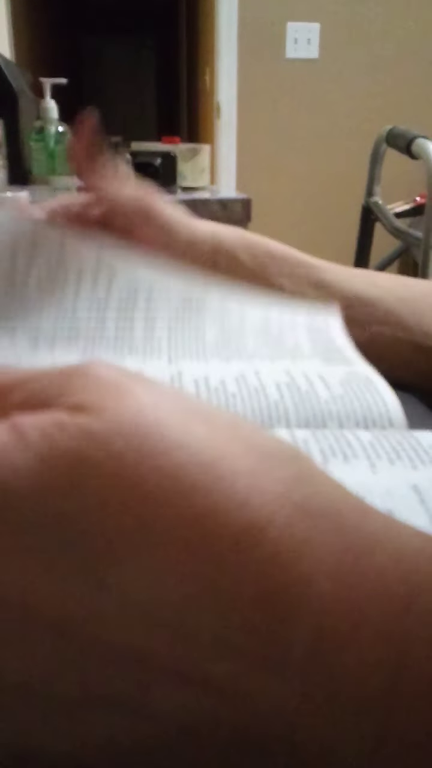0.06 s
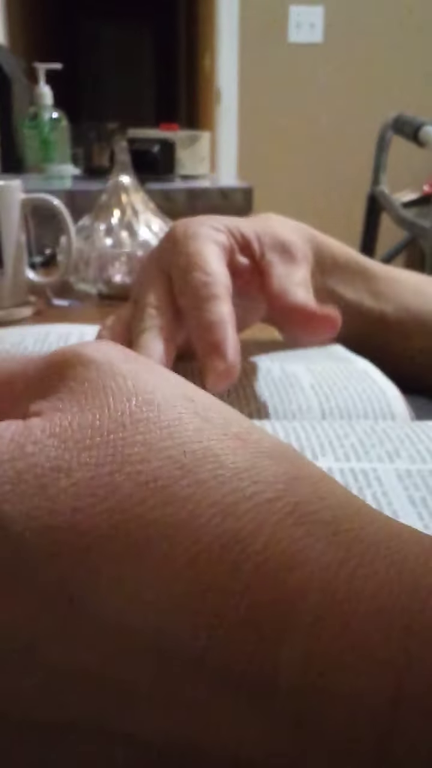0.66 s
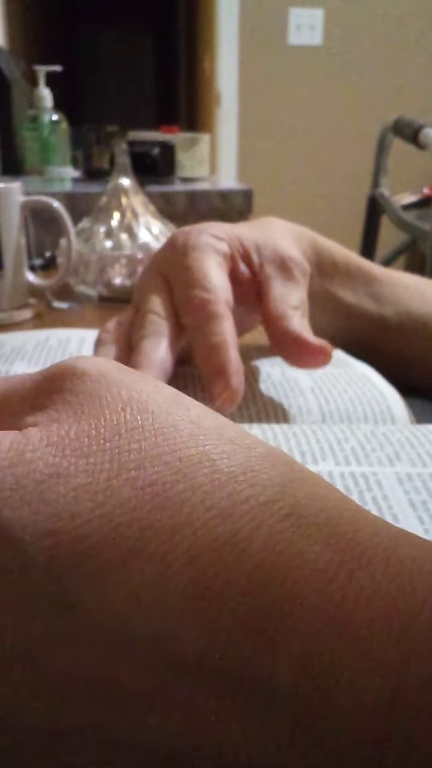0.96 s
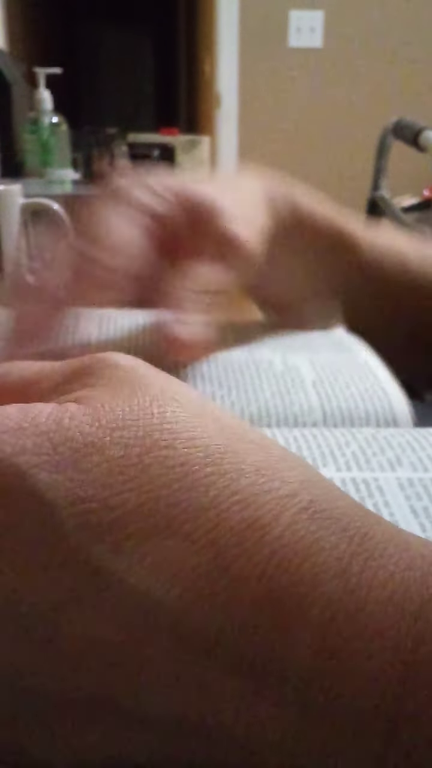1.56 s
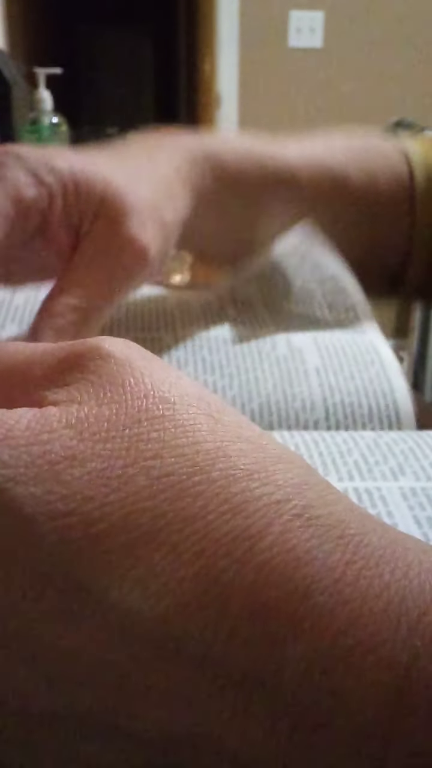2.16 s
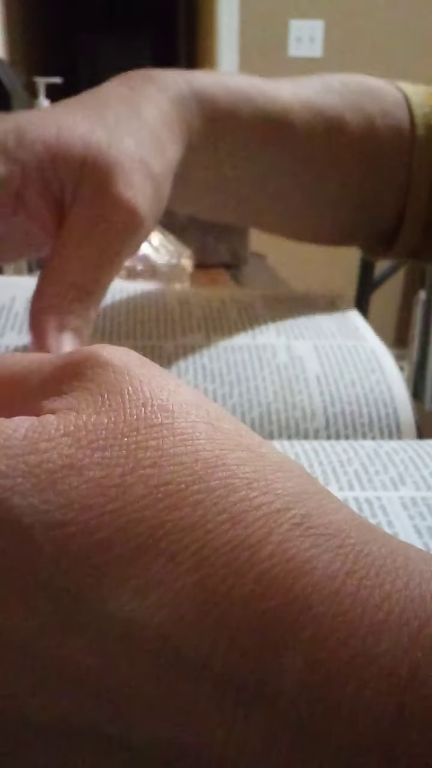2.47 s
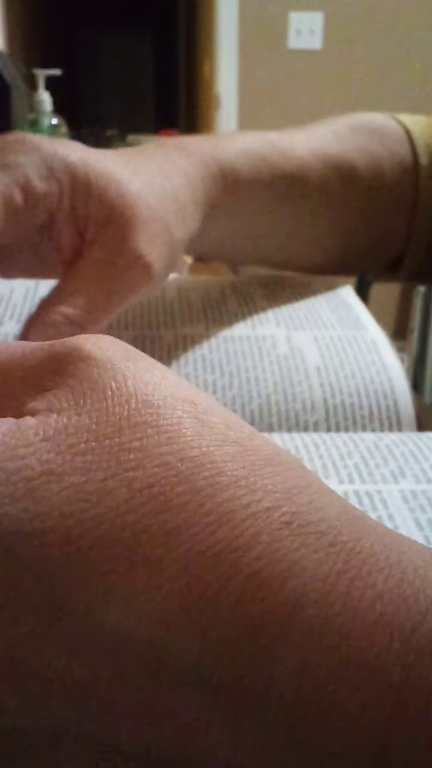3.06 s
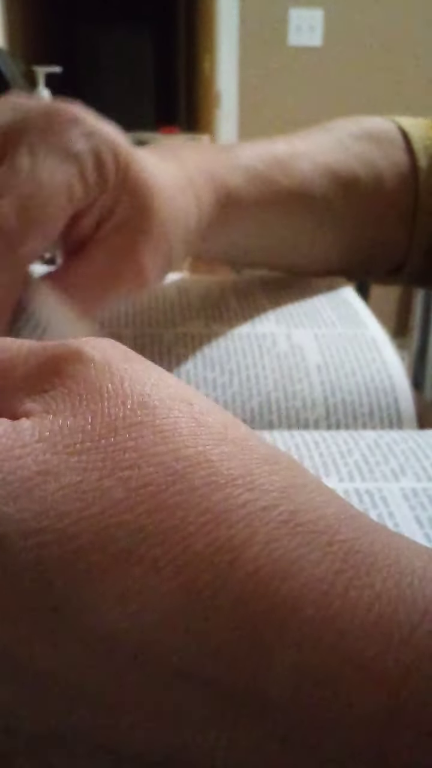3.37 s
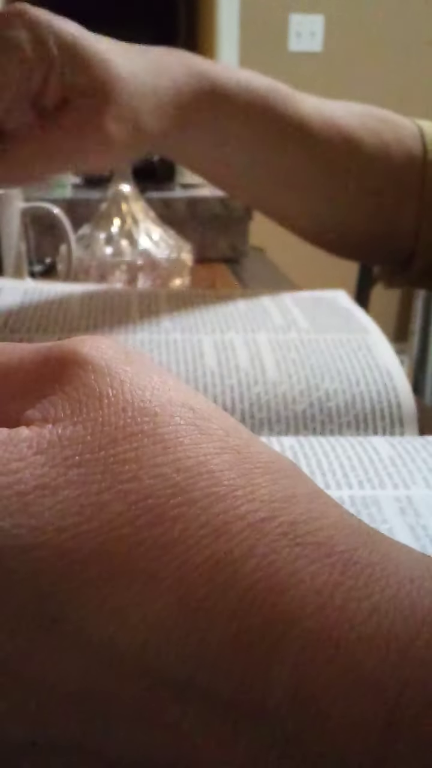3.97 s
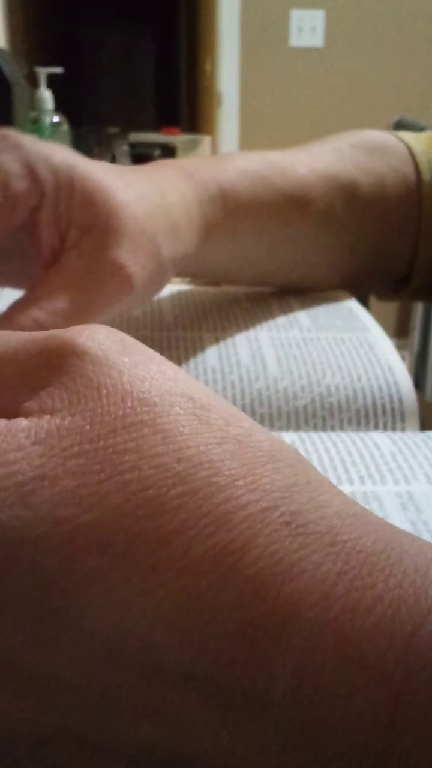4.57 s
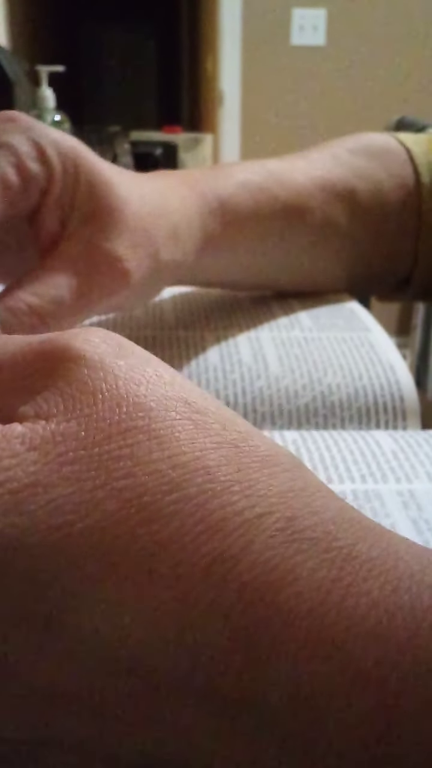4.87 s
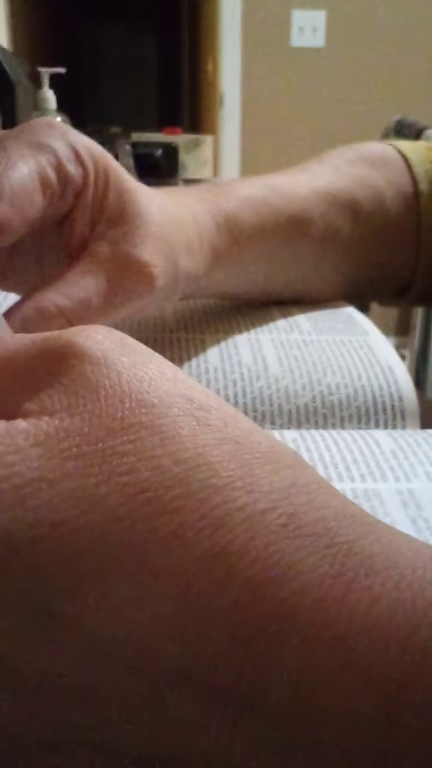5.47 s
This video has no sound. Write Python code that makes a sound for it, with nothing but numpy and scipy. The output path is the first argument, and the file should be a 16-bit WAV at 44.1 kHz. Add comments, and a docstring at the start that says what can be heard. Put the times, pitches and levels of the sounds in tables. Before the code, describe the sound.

A hand turns a thin page of a thick book, and the sheet buckles in a quick run of snaps and crinkles. Fingers then slide softly over the paper and pick at its edges with small flicks and ticks. A second page turns with a sharper snap, followed by more faint rubbing. It is all heard close up in a small room, over a steady low appliance hum.

```python
"""In a small room, close by, a hand turns the thin pages of a thick book twice.
Each sheet buckles in a quick run of snaps, crinkles as its small creases give way, and flops down.
Between turns, fingers slide over the paper, which sticks and slips, and pick at its edges.
Underneath, an appliance hums on mains power over faint room noise."""
import sys
import numpy as np
from scipy import signal
from scipy.fft import rfft, irfft, next_fast_len
from scipy.io import wavfile
from scipy.ndimage import map_coordinates

SR = 44100
rng = np.random.default_rng(int(sys.argv[2]) if len(sys.argv) > 2 else 0)


def wav_out(sig):
    """Save sig, one row per channel (or a flat mono array), as 16-bit PCM at SR to the path in sys.argv[1]."""
    wavfile.write(sys.argv[1], SR, np.round(np.clip(np.atleast_2d(sig).T, -1, 1) * 32767).astype(np.int16))


N = 248784
TIME = np.arange(N) / SR


def snaps(crackle_fade_s=.028):
    """A buckling sheet pushes out a short pop, flaps briefly, and its creases crackle."""
    # each time the sheet buckles: start_s, pop_db, pitch_hz, crackle_db
    buckles = [(0.3941, -28.5, 464, -44), (.3960, -17, 1120, -39.5), (.3995, -24.5, 772, -56),
               (0.46, -47, 1210, -49), (0.474, -13.5, 1110, -32.5), (0.4878, -25, 1290, -33.5),
               (.5150, -26, 1130, -27), (0.5185, -28, 1370, -26), (0.5452, -13, 716, -56),
               (.553, -20, 1244, -54), (.5580, -24, 840, -56.5), (3.673, -42.5, 1101, -44.5),
               (3.7031, -27, 1039, -32.5), (3.7118, -7.5, 1271, -17), (3.7162, -29.5, 474, -40),
               (3.722, -31, 1500, -32), (3.731, -29.5, 1593, -42), (3.7643, -21.5, 1090, -34.5),
               (3.7814, -26, 1273, -47), (3.788, -23, 1200, -46), (3.8140, -39.5, 1170, -58)]
    # harder pops start faster and end sooner: pop_db, attack_s, fade_s (time to fall 60 dB)
    pop_shapes = [(-28, .001, .03), (-22, 0.00073, .024), (-16, 0.00036, .008), (-11, .0003, .007)]
    # tone of the flapping paper: frequency_hz, level_db
    flap_tone = [(150, -19.5), (450, -7.5), (800, -6), (1250, 2), (1800, -5.5), (2400, -4), (3700, -11.5),
                 (5000, -25), (6500, -32.5), (8200, -60)]
    t = np.arange(SR // 8) / SR
    opening = 1 - np.exp(-t / 0.00038)  # creases open almost at once
    first_crack = 0.75 + 0.34 * np.exp(-t / 0.00062)  # the first crease gives way hardest
    strengths, attacks, fades = np.transpose(pop_shapes)
    pops, flap_power, crease_power = np.zeros((3, N))
    for start_s, pop_db, pitch_hz, crackle_db in buckles:
        span = slice(round(start_s * SR), round(start_s * SR) + len(t))
        attack_s = np.interp(pop_db, strengths, attacks)
        fade_s = np.interp(pop_db, strengths, fades)
        push = (1 - np.exp(-t / attack_s)) * gain(pop_db - 60 * t / fade_s)
        sagging_hz = pitch_hz * (1 + 0.13 * np.exp(-t / 0.00078))  # the bent paper relaxes
        pops[span] += push * np.sin(2 * np.pi * np.cumsum(sagging_hz) / SR)
        flap_power[span] += (push * min(1, 1200 / pitch_hz)) ** 2  # small, high patches flap less
        crease_power[span] += (opening * first_crack * gain(crackle_db - 60 * t / crackle_fade_s)) ** 2
    # the pops are heard with little bass and no top treble
    pops = signal.sosfilt(signal.butter(2, 130, "high", fs=SR, output="sos"), pops)
    pops = signal.sosfilt(signal.butter(10, 6900, fs=SR, output="sos"), pops)
    flap = gain(-11) * colour(np.sqrt(flap_power) * rng.standard_normal(N), flap_tone)
    return pops + flap + crackle(np.sqrt(crease_power) * rng.standard_normal(N))


def crackle(noise):
    """Give noise the crisp sound of paper creases giving way."""
    # tone of the creases: frequency_hz, level_db
    crease_tone = [(40, -14), (150, -5.5), (450, -5), (750, -5.5), (1300, 7), (1900, 1.5), (2400, 5),
                   (2900, -0.5), (3800, 1), (5000, -3.5), (6500, -1), (7200, -22), (8000, -44),
                   (15500, -43)]
    return colour(noise, crease_tone)


def crinkles():
    """As the bent sheet swings over, many small creases give way and its body flutters."""
    # each bend of the sheet: start_s, length_s, level_db
    bends = [(0.405, .02, -61), (0.508, 0.024, -46.5), (3.716, 0.075, -42.5)]
    # tone of the fluttering sheet: frequency_hz, level_db
    flutter_tone = [(200, -29), (700, -15), (1000, -4.5), (1250, 1), (1600, -1), (2400, -11.5), (5000, -29),
                    (8000, -57)]
    bending = sum(gain(level_db) * held(start_s, length_s, attack_s=0.0057, fade_s=.13)
                  for start_s, length_s, level_db in bends)
    flutter = patchy(fibres(spread_db=3.5), depth_db=7.5, width_hz=150, length_s=.03)
    creases = crackle(bending * fibres(spread_db=2.5))
    return creases + gain(-5) * colour(bending * flutter, flutter_tone)


def edge_flicks():
    """A page edge scrapes past a fingertip: a short swell with fizz on top."""
    # each flick: peak_s, level_db, rise_s, fizz_db (compared with the scrape)
    flicks = [(.519, -50.5, 0.0051, -5), (1.595, -49.5, 0.012, -12.5), (2.028, -60.5, .015, -9),
              (2.326, -54.5, 0.0077, -35), (2.818, -55, 0.012, -7), (2.984, -49, .009, -11),
              (3.658, -52, .008, -8.5), (3.719, -40.5, 0.0092, -8.5), (3.765, -43, 0.015, -13.5),
              (4.608, -56, 0.017, -23), (5.584, -57, 0.0062, -23)]
    # tone of the scraping edge: frequency_hz, level_db
    edge_tone = [(300, -25.5), (900, -15), (1350, 7), (2000, -11.5), (2400, 5), (2900, -6.5), (3700, 1),
                 (5200, 3.5), (6500, 12), (7200, 4), (8200, -36.5), (15500, -33.5)]
    # tone of the high fizz: frequency_hz, level_db
    fizz_tone = [(6000, -23), (8000, -7), (9500, -11), (12000, -4), (13500, -8), (15000, -2), (15800, 1.5)]
    scrape, fizz = np.zeros((2, N))
    for peak_s, level_db, rise_s, fizz_db in flicks:
        stroke = gain(level_db) * swell(peak_s, rise_s, fall_s=1.3 * rise_s)
        scrape += stroke
        fizz += stroke * gain(fizz_db)
    grains = fibres(spread_db=3.5)
    drifting_grains = patchy(grains, depth_db=2.0, width_hz=300, length_s=.05)
    return colour(scrape * drifting_grains, edge_tone) + colour(fizz * grains, fizz_tone)


def edge_ticks():
    """An edge catches on a fingertip and slips off with one tiny crackle."""
    # each slip: start_s, level_db
    slips = [(1.389, -51.5), (1.5628, -55), (1.5883, -47), (2.8006, -65), (3.425, -54), (3.483, -50.5),
             (3.6537, -44.5), (3.6663, -50.5)]
    bursts = sum(gain(level_db) * held(start_s, length_s=0.00079, attack_s=0.00049, fade_s=0.013)
                 for start_s, level_db in slips)
    return crackle(bursts * rng.standard_normal(N))


def slides():
    """Paper sticks and slips on paper and skin; its tone drifts as the sheet bends."""
    # each slide: start_s, length_s, rub_db, hiss_db, growth_db (change along the slide)
    strokes = [(-.03, .33, -65.5, -65.5, -4), (0.274, .11, -70.5, -74.5, -3),
               (0.582, 0.035, -74, -65.5, -3), (.65, .1, -72.5, -91.5, -7), (1.077, 0.033, -71, -82, 0),
               (1.227, 0.026, -76, -90, 0), (1.327, 0.12, -65, -71, 4.5), (1.44, .1, -65, -64, 2.5),
               (1.553, .21, -72, -63.5, -1.5), (1.789, 0.24, -73, -76, 15), (1.999, .33, -69, -62.5, 7),
               (2.096, 0.034, -64, -63, 2.5), (2.557, .14, -78, -83.5, 4), (2.696, .05, -67, -68.5, 1.5),
               (2.775, 0.068, -68, -67, -3), (2.959, 0.048, -64.5, -61, 1.5),
               (3.075, .18, -72.5, -69, -3.5), (3.252, 0.13, -72, -74, 2.5), (3.39, 0.12, -65, -68.5, 4.5),
               (3.514, 0.18, -69, -69, 5.5), (3.822, 0.18, -75.5, -72, -8), (4.247, 0.25, -80.5, -85.5, -2),
               (4.444, .085, -64.5, -67, 7.5), (4.561, 0.095, -63, -61.5, 3),
               (4.693, 0.039, -66, -63.5, -2.5), (4.778, 0.048, -70.5, -68, 3), (4.907, 0.1, -79, -89, -2),
               (5.007, 0.25, -77.5, -76, 1.5), (5.237, .14, -69, -71.5, -5), (5.492, .1, -67.5, -64.5, 11)]
    # tone of the lower rubbing: frequency_hz, level_db
    rub_tone = [(200, -30), (450, -21), (900, -15), (1100, -8.5), (1320, 4), (1520, -8.5), (1800, -4.5),
                (2060, -14), (2340, 2), (2650, -9), (3400, -16.5), (8000, -64)]
    # tone of the higher hiss: frequency_hz, level_db
    hiss_tone = [(1500, -32), (2600, -15), (3200, -9), (3750, 0), (4300, -8.5), (5200, -4), (6400, 6),
                 (7100, -9), (8200, -31.5), (10500, -36.5), (12000, -28), (13500, -40), (15500, -22.5)]
    rub, hiss = np.zeros((2, N))
    for start_s, length_s, rub_db, hiss_db, growth_db in strokes:
        speed = held(start_s, length_s, attack_s=0.03, fade_s=.15, growth_db=growth_db)
        rub = np.hypot(rub, gain(rub_db) * speed)  # overlapping slides add in power
        hiss = np.hypot(hiss, gain(hiss_db) * speed)
    grip = unit_level(gain(1.8 * wobble(70)))
    grains = grip * patchy(fibres(spread_db=1.5), depth_db=3.5, width_hz=200, length_s=.08)
    return colour(rub * grains, rub_tone) + colour(hiss * grains, hiss_tone)


def palm():
    """A soft palm lands on the stack of pages with a dull brush."""
    # tone of skin on the pages: frequency_hz, level_db
    palm_tone = [(250, -1.5), (750, 8.5), (1200, 13), (1750, 8.5), (2400, 1), (3000, -29), (3900, 4),
                 (4500, -46), (9000, -71)]
    touch = gain(-55.5) * held(start_s=1.905, length_s=0.077, attack_s=.035, fade_s=.1)
    return colour(touch * fibres(spread_db=2.0), palm_tone)


def brushes():
    """Moving hands and bending sheets stir the book: soft puffs of noise, each around one pitch."""
    # each movement: peak_s, level_db, rise_s (also its fall), pitch_hz
    movements = [(.03, -70.5, 0.095, 326), (.24, -62, 0.032, 1284), (0.391, -46.5, 0.008, 980),
                 (0.398, -44, 0.0052, 503), (0.547, -55.5, 0.02, 74), (0.548, -39, 0.0056, 370),
                 (0.713, -66.5, 0.0071, 2680), (1.111, -72.5, 0.013, 2900), (1.401, -68.5, 0.016, 580),
                 (2.329, -55.5, 0.014, 3400), (2.33, -68.5, 0.065, 350), (3.485, -54.5, 0.0038, 2530),
                 (3.681, -56, 0.027, 1000), (3.718, -50.5, 0.0097, 370), (4.213, -73, .035, 465),
                 (5.284, -67.5, 0.029, 2740), (5.355, -62, 0.015, 2900), (5.5, -72, 0.062, 309)]
    puffs = np.zeros(N)
    for peak_s, level_db, rise_s, pitch_hz in movements:
        band = signal.butter(2, [pitch_hz / 1.2, pitch_hz * 1.164], "band", fs=SR, output="sos")
        noise = unit_level(signal.sosfilt(band, rng.standard_normal(N)))
        puffs += gain(level_db) * swell(peak_s, rise_s, fall_s=rise_s) * noise
    return puffs


def low_background():
    """Faint, low background noise that wavers at random."""
    # tone of the low noise: frequency_hz, level_db
    low_tone = [(150, -24), (310, -3.5), (500, -2), (900, -25.5), (3000, -60.5)]
    noise = patchy(rng.standard_normal(N), depth_db=5.5, width_hz=110, length_s=0.072)
    return gain(-82.7 + 3.5 * wobble(11)) * colour(noise, low_tone)


def room_echo(sound, near_db, tail_db):
    """Sound bounces off the book and table almost at once; the walls add a short tail."""
    # how long the wall echo takes to fall 60 dB: frequency_hz, fade_s
    wall_fades = [(150, .35), (1200, 0.23), (3000, 0.18), (6500, 0.27), (14000, 0.062)]
    hz, t, bands = signal.stft(rng.standard_normal(SR // 2), SR, nperseg=256)
    fading = gain(-60 * t / look_up(wall_fades, hz)[:, None])
    tail = signal.istft(bands * fading, SR, nperseg=256)[1]
    delay_s = np.arange(len(tail)) / SR
    tail *= 1 - np.exp(-delay_s / 0.0021)
    near = rng.standard_normal(len(delay_s)) * gain(-60 * delay_s / 0.15) * (delay_s > .001)
    echoes = gain(near_db) * near / np.linalg.norm(near) + gain(tail_db) * tail / np.linalg.norm(tail)
    return signal.fftconvolve(sound, echoes)[:N]


def mains_hum(pitch_hz=120):
    """An appliance hums at twice the mains frequency, with one faint overtone."""
    phase = 2 * np.pi * pitch_hz * TIME + 0.033 * wobble(3.3)
    low_note = gain(-56.0 + 0.91 * wobble(15)) * np.sin(phase)
    overtone = gain(-86.5) * np.sin(3 * phase)
    return np.sqrt(2) * (low_note + overtone)


def room_air():
    """Faint, wavering noise fills the room."""
    # tone of the air: frequency_hz, level_db
    air_tone = [(25, -27.5), (75, -3.5), (140, 2.5), (220, -7), (350, -15), (600, -15.5), (1000, -22.5),
                (1300, -16.5), (1600, -25), (2050, -29), (2340, -22), (2700, -28), (4000, -29), (6800, -30),
                (8500, -42.5), (13500, -39.5), (15200, -34)]
    air = patchy(rng.standard_normal(N), depth_db=1, width_hz=68, length_s=0.03)
    return gain(-69.5) * colour(air, air_tone)


def fibres(spread_db):
    """Countless tiny slips of paper fibres clump into grains of uneven size."""
    return unit_level(rng.standard_normal(N) * gain(spread_db * wobble(1500)))


def gain(db):
    """Turn decibels into a number to multiply by."""
    return 10 ** (np.asarray(db) / 20)


def unit_level(sound):
    """Scale a sound so its average power is 1."""
    return sound / np.sqrt(np.mean(sound ** 2) + 1e-20)


def look_up(points, hz):
    """Read between (frequency_hz, value) rows, with octaves evenly spaced."""
    frequencies, values = np.transpose(points)
    return np.interp(np.log(hz + 1), np.log(frequencies), values)


def held(start_s, length_s, attack_s, fade_s, growth_db=0):
    """A loudness curve that rises, holds (changing by growth_db), then falls 60 dB every fade_s."""
    t = TIME - start_s
    hold_db = growth_db * (np.clip(t / length_s, 0, 1) - .5)
    drop_db = 60 * np.maximum(t - length_s, 0) / fade_s
    return np.clip(t / attack_s, 0, 1) * gain(hold_db - drop_db)


def swell(peak_s, rise_s, fall_s):
    """A bell-shaped loudness curve with its top at peak_s."""
    return np.exp(-.5 * ((TIME - peak_s) / np.where(TIME < peak_s, rise_s, fall_s)) ** 2)


def wobble(points_per_s):
    """A smooth curve through random points."""
    return map_coordinates(rng.standard_normal(int(N * points_per_s / SR) + 4), [TIME * points_per_s])


def colour(sound, tone, size=4096):
    """Filter a sound by a tone table; white noise keeps its overall power."""
    cepstrum = irfft(np.log(gain(look_up(tone, np.fft.rfftfreq(size, 1 / SR)))))
    # fold it so the filter rings only after a sound, never before
    cepstrum[1:size // 2] *= 2
    cepstrum[size // 2 + 1:] = 0
    response = irfft(np.exp(rfft(cepstrum)))
    return signal.fftconvolve(sound, response / np.linalg.norm(response))[:N]


def patchy(sound, depth_db, width_hz, length_s):
    """Let the tone drift: random patches of pitch and time get louder or softer."""
    hz, t, bands = signal.stft(sound, SR, nperseg=1024)
    positions = np.meshgrid(hz / width_hz, t / length_s, indexing="ij")
    patches = map_coordinates(rng.standard_normal((400, 400)), positions, mode="mirror")
    return unit_level(signal.istft(bands * gain(depth_db * patches), SR, nperseg=1024)[1][:N])


def scene():
    """Paper sounds and low noise echo in the room, over the hum and the air, in one channel."""
    paper = snaps() + crinkles() + edge_ticks() + edge_flicks() + slides() + palm() + brushes()
    direct = paper + low_background()
    echo = room_echo(direct, near_db=-10.5, tail_db=-17.0)
    return (direct + echo + mains_hum() + room_air())[None]


def record(dry):
    """Cut away the very highest treble."""
    top_hz = 15800
    size = next_fast_len(N + SR // 2)
    kept = np.fft.rfftfreq(size, 1 / SR) < top_hz
    return irfft(rfft(dry, size) * kept, size)[:, :N]


dry = scene()
out = record(dry)
wav_out(out)
```